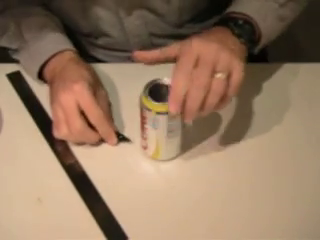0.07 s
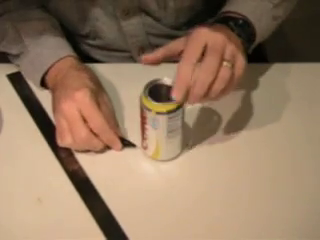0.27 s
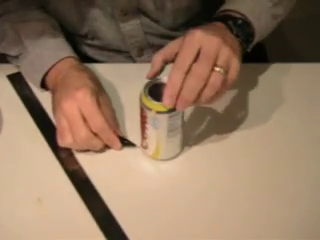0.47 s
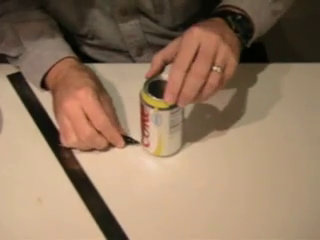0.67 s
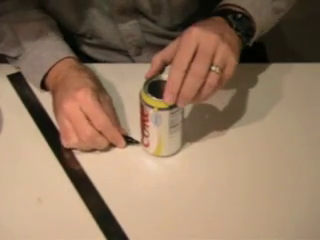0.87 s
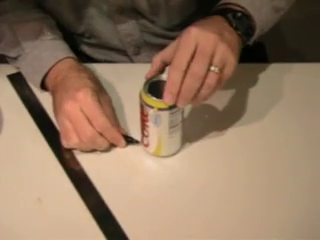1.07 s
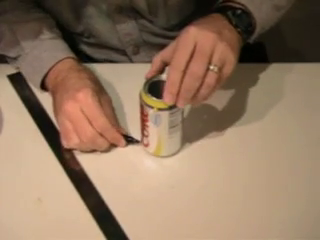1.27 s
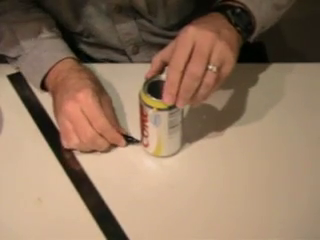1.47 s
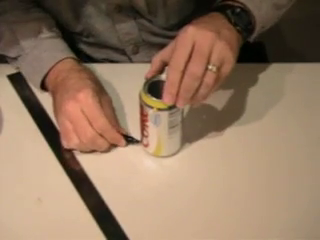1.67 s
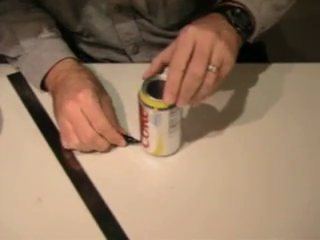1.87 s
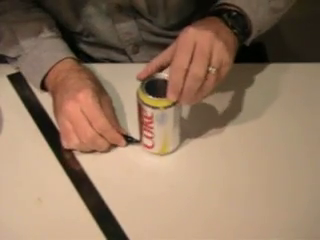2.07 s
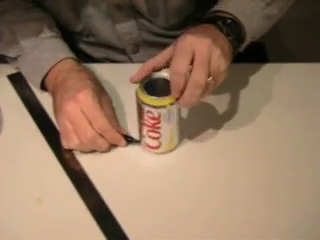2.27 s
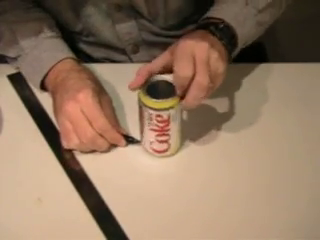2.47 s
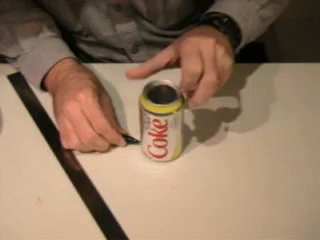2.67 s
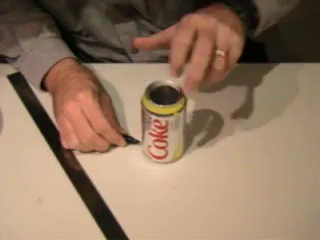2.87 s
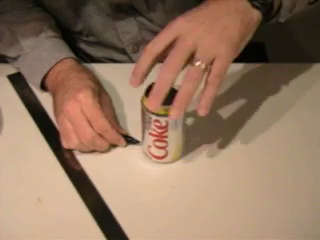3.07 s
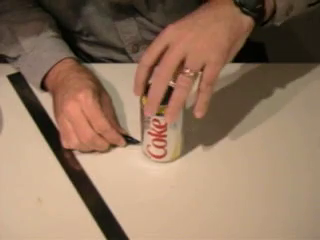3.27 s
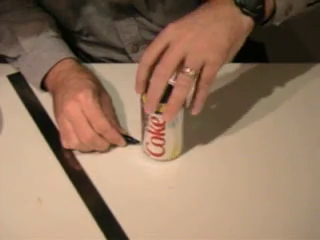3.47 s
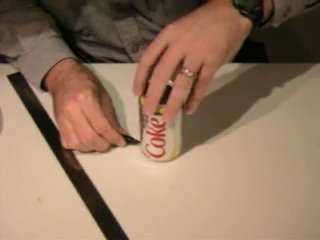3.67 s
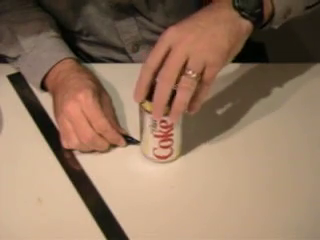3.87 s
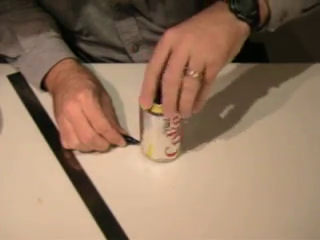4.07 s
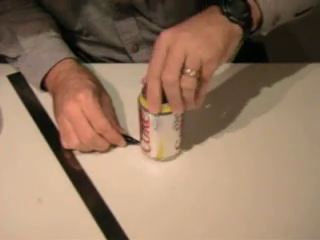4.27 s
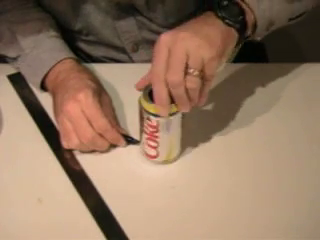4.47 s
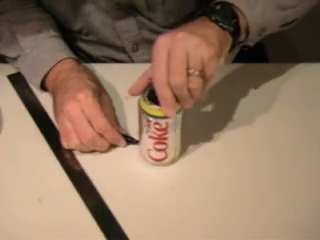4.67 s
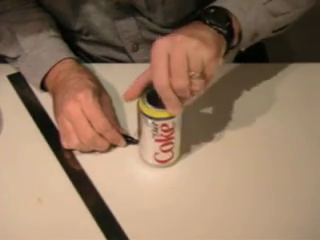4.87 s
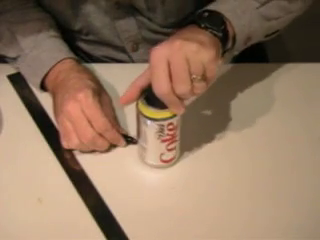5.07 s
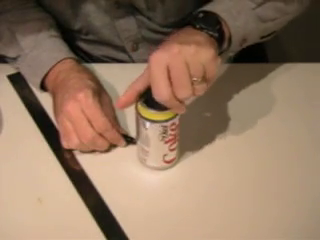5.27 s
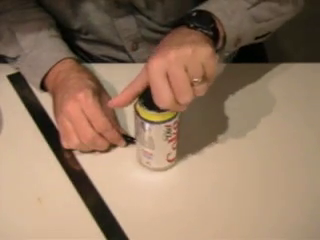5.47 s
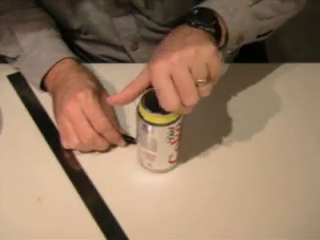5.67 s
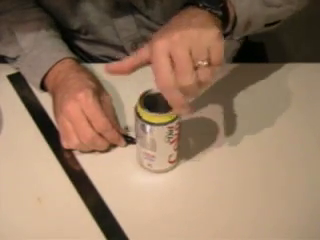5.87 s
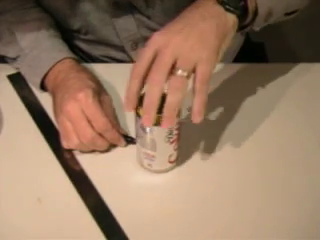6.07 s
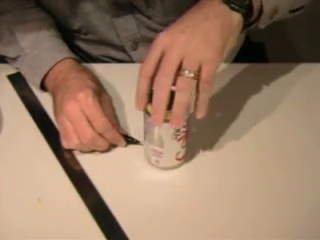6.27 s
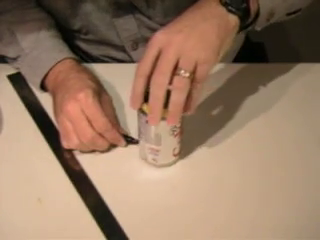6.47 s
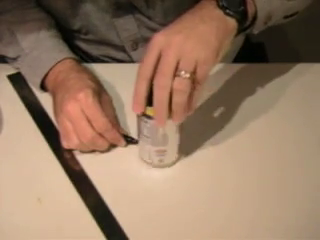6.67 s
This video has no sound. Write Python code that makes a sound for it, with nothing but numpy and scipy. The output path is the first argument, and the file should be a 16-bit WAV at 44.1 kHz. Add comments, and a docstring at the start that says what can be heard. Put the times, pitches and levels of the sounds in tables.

```python
"""Drink can turned on a tabletop.

An empty can is turned by hand against a pen tip, in a small quiet room with mains hum. First a hand
slides with a soft swish. The base grinds on the table in tiny slips and knocks down as the fingers
let go or grip again, ringing table, hollow and thin wall. The metal catches in short squeaks."""
import sys
import numpy as np
from scipy import signal
from scipy.fft import rfft, irfft
from scipy.io import wavfile

SR = 44100
rng = np.random.default_rng(int(sys.argv[2]) if len(sys.argv) > 2 else 0)


def master(y):
    """Save y as 16-bit WAV."""
    cut = np.clip(np.atleast_2d(y).T, -1, 1)
    pcm = np.round(cut * 32767)  # scale
    wavfile.write(sys.argv[1], SR, pcm.astype(np.int16))


N = 296352

# mains hum: freq_hz, rms_db
HUM_PARTIALS = [(59.1, -57.5), (118.3, -78.5), (180, -75.5)]
# room air: freq_hz, density_db
AIR_SPECTRUM = [(44, -37.5), (75, -10.5), (86, -19.5), (108, -9.5), (126, -15.5), (142, -20.5),
                (200, -21.5), (257, -24.5), (450, -25.5), (1840, -38), (2230, -41), (5100, -50),
                (7500, -73.5), (9750, -108.5), (16500, -120)]
# hand friction: freq_hz, density_db
SLIDE_SPECTRUM = [(53, -51), (90, -25), (151, 5), (283, -9), (335, 2.5), (388, -15), (434, -1), (476, -9.5),
                  (617, -7.5), (860, -10), (1050, -9.5), (2050, -14.5), (3450, -13.5), (6120, -32),
                  (7500, -45.5), (9750, -92), (16500, -120)]

# thin wall ringing free of the fingers: start_s, level_db, pitch_hz
WALL_RINGS = [(2.679, -66, 4800), (2.729, -63, 6000), (2.783, -68, 5600), (5.719, -66, 4400),
              (5.742, -74, 6500), (5.760, -63, 6500), (5.782, -69, 6500)]
# thin wall: freq_hz, gain_db, t60_s
WALL_MODES = [(4350, 0, .11), (5535, -1, .13), (6420, 0, .11)]
# metal catching and slipping: start_s, level_db, pitch_hz, length_s
SQUEAKS = [(0.155, -50.5, 3490, .004), (1.793, -52.5, 3450, 0.0037), (1.81, -57, 3280, 0.0045),
           (2.038, -52, 3130, 0.0038), (2.16, -49.5, 3050, 0.006), (2.482, -50, 3240, 0.014),
           (2.544, -58, 3320, 0.011), (2.612, -62.5, 3490, 0.024), (4.422, -48.5, 3300, 0.0064),
           (4.789, -56.5, 2705, 0.037), (5.466, -64.5, 3900, 0.021), (5.513, -48, 3080, 0.003),
           (5.542, -53.5, 2960, .0055), (5.647, -58.5, 2820, 0.017)]

# table under the can: freq_hz, gain_db, t60_s
TABLE_MODES = [(150.8, -0.5, 0.18), (167.4, -3, 0.15), (215.8, -2.5, 0.29)]
# can and table rocking together: freq_hz, gain_db, t60_s
ROCKING_MODES = [(308.8, -5.5, 0.15), (348.5, -3.5, 0.12), (396, -10.5, 0.14), (860, -11, 0.11),
                 (1020, -3, 0.11), (1300, -8.5, 0.39)]
# hollow of the can, damped by a tight grip: freq_hz, gain_db, t60_s
HOLLOW_MODES = [(526.8, -2.5, 0.3), (571, -8.5, .17), (676, -10.5, 0.23), (726, -15.5, 0.14)]
# thin metal: freq_hz, gain_db, t60_s
METAL_MODES = [(1610, -5, 0.068), (2327, -7, 0.08), (2720, 5.5, 0.034), (2880, 0, 0.043), (3040, 2, 0.022),
               (3570, -5, 0.029), (4170, -7, 0.013), (5360, -32.5, 0.052), (6520, -32.5, 0.039)]
# base knocking down: start_s, level_db, softness, hollow_gain_db, thud_gain_db
BASE_KNOCKS = [(0.498, -40, 1.77, -4, -2.5), (0.543, -45, 0.72, 12.5, -13), (0.552, -41, 1.1, 5, -13),
               (0.575, -42, 1.7, 12, -22), (0.881, -71, 1.2, 9, 18), (1.049, -58, 1.4, -13, -22),
               (1.114, -62, 1.2, 5, 2), (1.427, -58, 1.24, -0.5, 5.5), (2.44, -51, 0.89, -2, 10),
               (2.679, -50.5, 2.3, 3, 2), (2.7215, -31.5, 2.07, -1, -14), (2.728, -31, 2.3, 16, -1.5),
               (2.78, -44.5, 1.65, -11, 6.5), (3.276, -41, 1.86, -8, -2.5),
               (3.283, -33.5, 2.15, -19, -16.5), (3.781, -51.5, 1.65, -16, -3), (4.423, -43.5, 1.43, 6, -5),
               (5.077, -64, 2.3, 0, 18.5), (5.139, -58.5, 1.2, 1, 15), (5.258, -54, 1.8, -8, -10),
               (5.558, -47.5, 2.1, 0.5, 1), (5.644, -42, 2.17, 0.5, -7), (5.76, -37, 1.6, .5, 1),
               (6.137, -43.5, 1.7, 2, 8.5), (6.145, -30.5, 1.37, 6.5, -26), (6.15, -30, 1.7, -1, -28),
               (6.203, -30, 1.42, 3, -21), (6.279, -39.5, 1.16, 9, -8), (6.38, -45.5, 1.1, 3, -4),
               (6.494, -47.5, 0.89, -1, -11)]
# light, hard taps on the wall: start_s, level_db, softness
WALL_TAPS = [(1.61, -56.5, 0.53), (1.845, -42.5, 0.79), (3.363, -57, 1), (3.611, -57.5, 0.68),
             (3.647, -61.5, 0.66), (5.741, -53, 0.86)]

# midrange resonances under the grinding base: freq_hz, width_hz, gain_db
GRIND_RESONANCES = [(516, 46, 4), (706, 146, -0.5), (924, 229, -0.5), (1097, 380, -2), (1360, 232, -3.5),
                    (1747, 178, -10.5)]
# treble scratch: freq_hz, width_hz, gain_db
SCRATCH_RESONANCES = [(2140, 840, -7.5), (2760, 180, 3), (2901, 220, 1.5), (3520, 340, -4.5),
                      (3823, 400, -7), (4840, 430, -16), (5340, 290, -19.5), (6680, 420, -26.5)]
# table rumble: freq_hz, width_hz, gain_db
RUMBLE_RESONANCES = [(144, 32, 10.5), (227, 33, 3.5), (325.4, 61, 7.5), (434, 110, -0.5)]
# one level curve per twist of the can: time_s, grind_db, scratch_db
TWIST_CURVES = [
    [(0.6, -65, -71), (0.68, -72, -75), (0.826, -69.5, -75), (1.25, -76.5, -88)],
    [(2.0, -62.5, -69.5), (2.074, -61.5, -69.5), (2.246, -58.5, -67.5), (2.398, -60.5, -66),
     (2.674, -60, -80), (2.78, -64, -78), (2.88, -76, -89)],
    [(3.68, -58.5, -76), (3.79, -57, -63.5), (3.904, -57, -71), (4.0, -57, -65.5), (4.142, -52.5, -64),
     (4.25, -60.5, -71)],
    [(4.3, -57, -68.5), (4.718, -55, -61.5), (5.03, -58, -66.5), (5.508, -59, -69), (5.666, -77, -80),
     (5.806, -71, -79), (5.92, -65, -85)],
    [(6.25, -54, -70), (6.312, -57.5, -62.5), (6.36, -53, -66), (6.494, -60, -73), (6.72, -57.5, -67.5)],
]
# rim digging in as the can is shoved or tipped: start_s, length_s, grind_db, scratch_db, rumble_db
RIM_SCRAPES = [(0.337, 0.18, -67, -72, -53.5), (0.506, 0.089, -49.5, -54.5, -42),
               (0.647, 0.044, -57.5, -59.5, -53), (0.751, 0.034, -65, -67, -56),
               (2.426, 0.081, -50, -58, -45.5), (2.703, 0.11, -60.5, -76, -44),
               (3.438, 0.076, -62, -76, -56), (3.761, .1, -54, -65.5, -53.5),
               (4.065, 0.13, -51.5, -59.5, -55.5), (4.392, 0.059, -49.5, -64.5, -46.5),
               (4.61, 0.047, -51, -65, -56), (5.139, .06, -56, -63.5, -53.5),
               (5.463, 0.1, -57, -64.5, -56.5), (5.635, 0.22, -64.5, -84, -50),
               (6.154, 0.12, -48, -59, -47), (6.399, 0.036, -47.5, -63, -48.5),
               (6.479, 0.038, -50.5, -60.5, -49.5)]


def from_db(db):
    """Decibels to gain."""
    return 10 ** (np.asarray(db) / 20)


def unit_rms(x):
    """Scale to unit power."""
    return x / np.sqrt(np.mean(x ** 2) + 1e-20)


def decay(t, t60_s):
    """Envelope losing 60 dB in t60_s."""
    return np.exp(-np.log(1000) * t / t60_s)


def add(out, start_s, sound):
    """Mix a sound in at start_s."""
    start = int(start_s * SR)
    out[start:start + len(sound)] += sound[:N - start]


def band(x, low_hz, high_hz, order=2):
    """Butterworth band-pass."""
    return signal.sosfilt(signal.butter(order, [low_hz, high_hz], "band", fs=SR, output="sos"), x)


def drift(rate_hz):
    """Slow random wander, unit rms."""
    hop, settle = 40, 2000
    r = np.exp(-2 * np.pi * rate_hz * hop / SR)
    white = rng.standard_normal(N // hop + settle + 2)
    slow = signal.lfilter([1], [1, -2 * r, r * r], white)[settle:]
    return np.interp(np.arange(N) / hop, np.arange(len(slow)), unit_rms(slow))


def coloured(x, spectrum):
    """Impose a smooth spectrum, unit rms."""
    hz, db = np.transpose(spectrum)
    bins_hz = np.maximum(np.arange(N // 2 + 1) * SR / N, 1)
    gain = from_db(np.interp(np.log(bins_hz), np.log(hz), db))
    return unit_rms(irfft(rfft(x) * gain, N))


def resonate(x, hz, width_hz, peak_db):
    """Two-pole resonance."""
    r = np.exp(-np.pi * width_hz / SR)
    poles = [1, -2 * r * np.cos(2 * np.pi * hz / SR), r * r]
    return from_db(peak_db) * (1 - r * r) / 2 * signal.lfilter([1, 0, -1], poles, x)


def struck(t, modes, scatter_db=2.5):
    """Decaying sines; each blow shares its energy among them differently."""
    out = 0
    for k, (hz, db, t60_s) in enumerate(modes):
        gain = (-1) ** k * from_db(db + scatter_db * rng.standard_normal())
        out += gain * decay(t, t60_s) * np.sin(2 * np.pi * hz * t)
    return out


def slips(rate_per_s, spread_db):
    """Tiny friction impulses of random time and size."""
    sizes = from_db(spread_db * np.minimum(rng.exponential(1, N), 4))
    signs = rng.choice([-1, 1], N)
    return sizes * signs * (rng.random(N) < rate_per_s / SR)


def room_air(level_db=-64):
    """Soft, steady low noise."""
    return from_db(level_db) * coloured(rng.standard_normal(N), AIR_SPECTRUM)


def mains_hum(waver_db=1.7):
    """Three low partials wavering together in level."""
    t = np.arange(N) / SR
    hum = sum(from_db(db) * np.sin(2 * np.pi * (hz * t + rng.random())) for hz, db in HUM_PARTIALS)
    return np.sqrt(2) * hum * from_db(waver_db * drift(1.6))


def room_reverb(x, t60_s=0.22, wet_db=-6.0, first_reflection_s=0.006):
    """Add a short, dull tail from the first wall reflection on."""
    t = np.arange(SR // 2) / SR
    envelope = decay(t, t60_s)
    onset = np.clip((t - first_reflection_s) / 0.0054, 0, 1)
    tail = band(rng.standard_normal(len(t)), 610, 3300, order=1) * envelope * onset
    tail /= np.sqrt(np.sum(envelope ** 2))
    return x + from_db(wet_db) * signal.fftconvolve(x, tail)[:N]


def sliding_hand(level_db=-46, sag_db_per_s=8, attack_s=0.078, lift_s=0.32):
    """Fine friction hiss that sags, then dies as the hand lifts."""
    t = np.arange(N) / SR
    attack = np.sqrt(np.minimum(t / attack_s, 1))
    release = decay(np.maximum(t - lift_s, 0), t60_s=0.24)
    hiss = coloured(slips(rate_per_s=24000, spread_db=4.5), SLIDE_SPECTRUM)
    return attack * release * from_db(level_db - sag_db_per_s * t) * hiss


def wall_rings(falloff_db_per_octave=39.0):
    """The released wall rings on, most strongly in the modes near one pitch."""
    t = np.arange(SR // 3) / SR
    out = np.zeros(N)
    for start_s, level_db, pitch_hz in WALL_RINGS:
        modes = [(hz, db - falloff_db_per_octave * abs(np.log2(hz / pitch_hz)), t60_s)
                 for hz, db, t60_s in WALL_MODES]
        add(out, start_s, from_db(level_db) * struck(t, modes, scatter_db=0.5))
    return out


def squeaks(fall_per_length=0.065, width_hz=900, tone_gain=0.85):
    """Stick-slip bursts: rough notes that sink in pitch as the tension goes."""
    t = np.arange(SR // 10) / SR
    out = np.zeros(N)
    for start_s, level_db, pitch_hz, length_s in SQUEAKS:
        age = t / length_s
        glide_hz = pitch_hz * (1 + fall_per_length * (0.5 - np.minimum(age, 2)))
        tone = tone_gain * np.sin(2 * np.pi * np.cumsum(glide_hz) / SR)
        rough = band(rng.standard_normal(len(t)), pitch_hz - width_hz / 2, pitch_hz + width_hz / 2)
        swell = 3 * age * np.exp(1 - 3 * age)
        add(out, start_s, from_db(level_db) * swell * unit_rms(unit_rms(rough) + tone))
    return out


def contact(level_db, softness, hollow_db, thud_db):
    """One blow: table thud, can knock, metal tick. Softer blows last longer and drive less treble."""
    t = np.arange(SR // 4) / SR
    thud, rocking = struck(t, TABLE_MODES), struck(t, ROCKING_MODES)
    hollow, metal = struck(t, HOLLOW_MODES), struck(t, METAL_MODES)
    white = rng.standard_normal(len(t))
    dense_modes = from_db(5.5) * unit_rms(band(white, 500, 2200)) * decay(t, 0.16)
    cushion = signal.butter(3, 1000 / softness, fs=SR, output="sos")
    knock = signal.sosfilt(cushion, rocking + from_db(hollow_db) * hollow + dense_modes)
    crack = unit_rms(band(white, 1600, 1500 + 1500 / softness, order=1))
    crack *= from_db(-3.5) * decay(t, 0.003) + from_db(-5.0) * decay(t, 0.097)
    tick_db = -11 - 11 * np.log2(softness)
    parts = (thud, thud_db), (knock, -1.0), (metal + crack, tick_db)
    attack = slice(0, SR // 50)   # levels hold for the first 20 ms
    return sum(from_db(level_db + db) * part / np.std(part[attack]) for part, db in parts)


def base_knocks(rebound_s=0.022, rebound_loss_db=13.5, thud_trim_db=-2.0):
    """The base hits the table, then the far side of the rim touches down."""
    out = np.zeros(N)
    for start_s, level_db, softness, hollow_db, thud_db in BASE_KNOCKS:
        for delay_s, loss_db in (0, 0), (rebound_s, rebound_loss_db):
            blow = contact(level_db - loss_db, softness, hollow_db, thud_db + thud_trim_db)
            add(out, start_s + delay_s, blow)
    return out


def wall_taps():
    """Light, hard blows on the wall that barely move the table."""
    out = np.zeros(N)
    for start_s, level_db, softness in WALL_TAPS:
        add(out, start_s, contact(level_db, softness, hollow_db=1, thud_db=-16))
    return out


def finger_touches(slot_s=0.25, mean_db=-70, spread_db=4.5):
    """The gripping fingers fidget: one faint touch per slot, from the first knock on."""
    out = np.zeros(N)
    gripped_s = BASE_KNOCKS[0][0]
    for slot_start_s in np.arange(gripped_s, N / SR - slot_s, slot_s):
        start_s = slot_start_s + slot_s * rng.random()
        level_db = rng.normal(mean_db, spread_db)
        add(out, start_s, contact(level_db, softness=1.4, hollow_db=0, thud_db=4.5))
    return out


def friction_levels_db(fade_db_per_s=251, attack_db_per_s=700, release_db_per_s=327.5):
    """Grind, scratch and rumble levels: the loudest of creep, twist and rim scrape."""
    t = np.arange(N) / SR
    grind_db, scratch_db = -81, -90   # creep of the held can
    for curve in TWIST_CURVES:
        time_s, twist_grind_db, twist_scratch_db = np.transpose(curve)
        fade_db = fade_db_per_s * np.abs(t - np.clip(t, time_s[0], time_s[-1]))
        grind_db = np.maximum(grind_db, np.interp(t, time_s, twist_grind_db) - fade_db)
        scratch_db = np.maximum(scratch_db, np.interp(t, time_s, twist_scratch_db) - fade_db)
    rumble_db = -59 + 0.75 * (grind_db + 59)   # follows 3/4 of the grind's swing
    levels_db = np.array([grind_db, scratch_db, rumble_db])
    for start_s, length_s, *held_db in RIM_SCRAPES:
        fade_db = attack_db_per_s * np.maximum(start_s - t, 0)
        fade_db += release_db_per_s * np.maximum(t - start_s - length_s, 0)
        levels_db = np.maximum(levels_db, np.array(held_db)[:, None] - fade_db)
    return levels_db


def grinding_base(judder_db=1.27, snag_db=13.5, rim_scatter_db=1.0, rumble_trim_db=-0.5):
    """The base slips in tiny jerks and snags on grit, driving resonances of can and table."""
    snags = from_db(snag_db) * slips(rate_per_s=14, spread_db=1.0)
    force = (slips(rate_per_s=2200, spread_db=2.0) + snags) * from_db(judder_db * drift(23))
    grind_db, scratch_db, rumble_db = friction_levels_db()
    layers = ((GRIND_RESONANCES, 380, 2600, grind_db),
              (SCRATCH_RESONANCES, 1600, 7500, scratch_db),
              (RUMBLE_RESONANCES, 95, 520, rumble_db + rumble_trim_db))
    out = np.zeros(N)
    for resonances, low_hz, high_hz, level_db in layers:
        ringing = np.zeros(N)
        for k, resonance in enumerate(resonances):
            coupling = from_db(rim_scatter_db * drift(3.7))   # contact point travels round the rim
            ringing += (-1) ** k * coupling * resonate(force, *resonance)
        out += from_db(level_db) * unit_rms(band(ringing, low_hz, high_hz))
    return out


def scene():
    """Mono mix of can, hand and room."""
    can = base_knocks() + wall_taps() + finger_touches() + squeaks() + wall_rings() + grinding_base()
    can = band(can, 120, 14000)   # small bodies radiate no deep bass
    return (room_reverb(can) + sliding_hand() + mains_hum() + room_air())[None]


def record(dry, cutoff_hz=7150):
    """Steep low-pass of a narrow-band recorder."""
    return signal.sosfilt(signal.butter(20, cutoff_hz, fs=SR, output="sos"), dry)


dry = scene()
out = record(dry)
master(out)
```